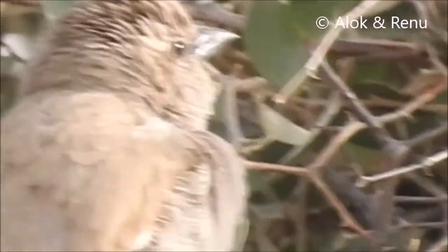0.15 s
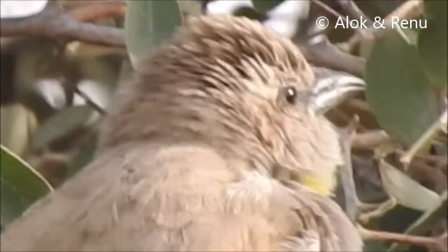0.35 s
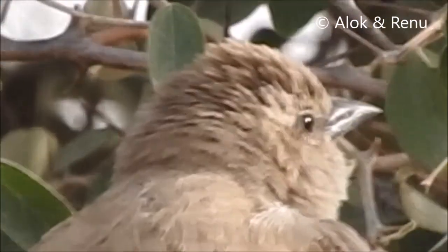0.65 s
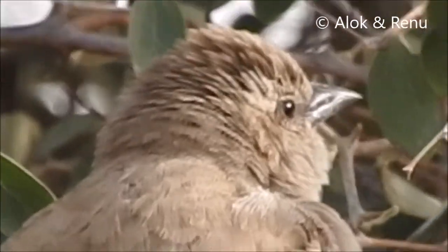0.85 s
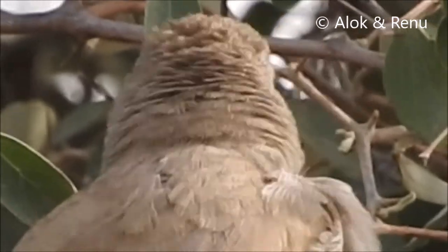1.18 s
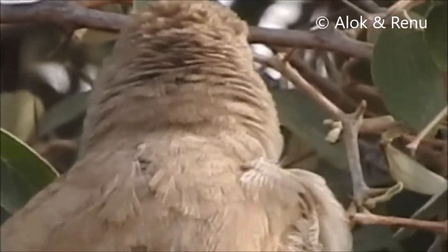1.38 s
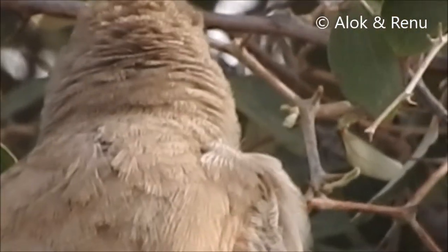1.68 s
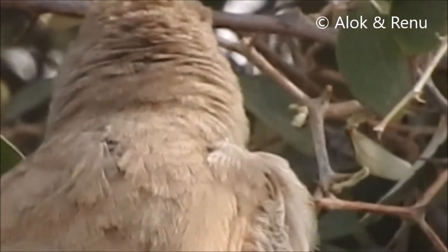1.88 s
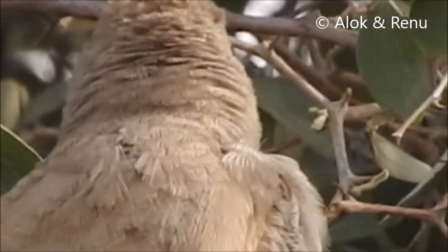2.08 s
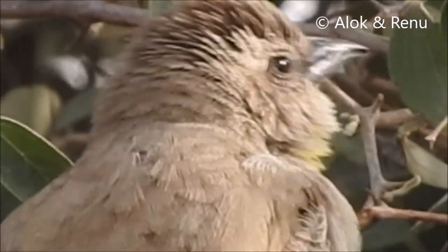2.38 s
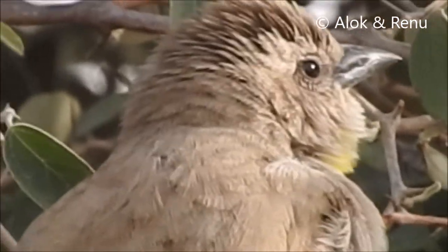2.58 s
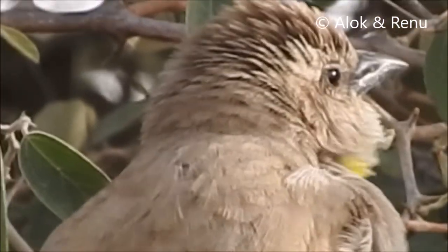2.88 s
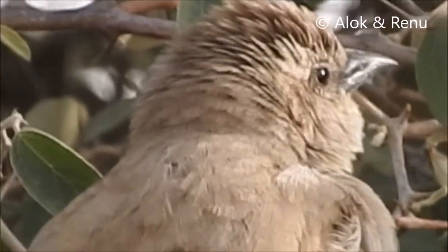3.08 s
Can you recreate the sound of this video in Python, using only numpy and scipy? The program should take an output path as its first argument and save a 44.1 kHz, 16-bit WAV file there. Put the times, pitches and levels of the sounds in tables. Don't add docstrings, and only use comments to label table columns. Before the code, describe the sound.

A sparrow chirps close to a stereo microphone in a leafy bush, four brief sharp chirps spaced apart; fainter neighbours answer between them, twigs tick, and dull traffic, low hum and wind lie quietly behind.

```python
import sys
import numpy as np
from scipy import signal
from scipy.fft import rfft, irfft
from scipy.io import wavfile
from scipy.ndimage import uniform_filter1d

SR = 44100
rng = np.random.default_rng(int(sys.argv[2]) if len(sys.argv) > 2 else 0)


def store_pcm(level_fs):
    pcm = np.round(np.clip(level_fs, -1, 1) * 32767).astype(np.int16)
    wavfile.write(sys.argv[1], SR, np.atleast_2d(pcm).T)


def convert_level_to_amplitude(level_db):
    exponent = np.asarray(level_db, float) / 20
    return 10 ** exponent


N = 143325

STRONG_WAVER_HZ, SLIGHT_WAVER_HZ = 60.4, 39.4


def rms_one(x):
    return x / np.sqrt(np.mean(x ** 2) + 1e-20)


def at_hz(points, hz):
    table_hz, value = np.transpose(points)
    return np.interp(np.log(hz), np.log(table_hz), value)


def drift(rate_hz):
    r = np.exp(-2 * np.pi * rate_hz / SR)
    noise = rng.standard_normal(N + SR)
    settled = signal.lfilter([1], [1, -2 * r, r * r], noise)[SR:]
    return rms_one(settled)


def resonance(x, hz, width_hz):
    r = np.exp(-np.pi * width_hz / SR)
    zeros = np.array([1, 0, -1]) * (1 - r * r) / 2
    poles = [1, -2 * r * np.cos(2 * np.pi * hz / SR), r * r]
    return signal.lfilter(zeros, poles, x)


def stereo_noise(colour, patchy_db=0.):
    # f/Hz, likeness [-1..1]
    likeness = [(40, 0.2), (200, 0.86), (1500, 0.74), (5000, 0.3), (9000, 0.12)]
    hz = np.maximum(np.fft.rfftfreq(N, 1 / SR), 1)
    alike = np.clip(at_hz(likeness, hz), -1, 1)
    mid, side = rfft(rng.standard_normal((2, N))) * colour(hz)
    both = irfft(np.sqrt(1 + alike) * mid + np.sqrt(1 - alike) * side * [[1], [-1]], N)
    return rms_one(both * convert_level_to_amplitude(patchy_db * drift(11.8)))


def murmur(x):
    out = 0
    for k, hz in enumerate(np.geomspace(220, 2600, 22)):
        swell = convert_level_to_amplitude(3.26 * drift(4.73))
        out = out + (-1) ** k * swell * resonance(x, hz, hz / 7.4)
    return rms_one(out)


def traffic():
    # f/Hz, level per Hz/dB
    wash_colour = [(250, -1), (470, -9.5), (900, -8), (1500, -16.5), (3000, -23.5)]
    wash = stereo_noise(lambda hz: convert_level_to_amplitude(at_hz(wash_colour, hz)) / (1 + (70 / hz) ** 4), patchy_db=-0.8)
    return murmur(wash)


def wind():
    wind_hz = 66.1

    def colour(hz):
        above = 1 + (hz / wind_hz / 2.42) ** 4
        below = 1 + (wind_hz * 0.66 / hz) ** 11.0
        return 1 / above / below
    return stereo_noise(colour, patchy_db=2.5)


def machine_hum():
    # f/Hz, width/Hz, level/dB
    hum_bands = [
        (120.3, 2.9, -59),
        (188.3, 23, -50.5),
        (216.5, 29.6, -51),
        (145, 70, -57),
    ]
    out = 0
    for hz, width_hz, db in hum_bands:
        band = stereo_noise(lambda f: 1 / (1 + (2 * (f - hz) / width_hz) ** 2))
        out = out + convert_level_to_amplitude(db) * band
    return out


def hiss():
    # f/Hz, level per Hz/dB
    hiss_colour = [(2000, -4), (4500, 3.5), (6600, -1), (9000, -5), (15500, -15)]
    return convert_level_to_amplitude(-58) * stereo_noise(lambda hz: convert_level_to_amplitude(at_hz(hiss_colour, hz)) / (1 + (1000 / hz) ** 2))


def street():
    # t/s, traffic level/dB, wind level/dB
    street_swell = [
        (.2, -48.5, -57.5),
        (.7, -51.5, -52.5),
        (1.45, -53.5, -55.5),
        (1.64, -53.5, -55),
        (1.82, -49, -61),
        (1.95, -54, -53),
        (2.4, -57.5, -48.5),
        (3.25, -57.5, -50.5),
    ]
    s, traffic_db, wind_db = np.transpose(street_swell)
    t = np.arange(N) / SR
    moving_traffic = convert_level_to_amplitude(np.interp(t, s, traffic_db)) * traffic()
    gusts = convert_level_to_amplitude(np.interp(t, s, wind_db) + 5.0) * wind()
    return moving_traffic + gusts + machine_hum() + hiss()


def distant_sounds():
    # t/s, length/s, f/Hz, width/Hz, level/dB
    far_events = [
        (.01, 1.7, 6300, 1400, -64),
        (.112, .056, 4000, 2500, -56),
        (1.062, .016, 4400, 2400, -47),
        (1.077, .019, 5000, 2400, -43),
        (1.1, .23, 3150, 100, -66),
        (1.6, .65, 340, 220, -55),
        (1.632, .016, 830, 150, -49),
        (1.85, .07, 3000, 700, -60),
        (2.03, .06, 5800, 900, -60),
        (2.172, .02, 4500, 1500, -52),
    ]
    t, out = np.arange(N) / SR, 0
    for s, length, hz, width_hz, db in far_events:
        noise = rng.standard_normal((2, N))
        band = resonance(resonance(noise, hz, width_hz), hz, width_hz)
        band = rms_one(band[0] + 0.28 * band[1] * [[1], [-1]])
        envelope = np.sin(np.pi * np.clip((t - s) / length, 0, 1)) ** 0.18
        out = out + convert_level_to_amplitude(db + 1.9 * drift(220)) * envelope * band
    return out


def bush(x, scatter_db):
    fall_60db_s, alike = .05, .3
    t = np.arange(SR // 8) / SR
    spray = rng.standard_normal((3, len(t))) * (rng.random((3, len(t))) < .04)
    spray = spray * convert_level_to_amplitude(-60 * t / fall_60db_s) * (t > .001)
    ears = np.sqrt(alike) * spray[0] + np.sqrt(1 - alike) * spray[1:]
    ears = convert_level_to_amplitude(scatter_db) * ears / np.sqrt(np.sum(ears ** 2, axis=1, keepdims=True))
    return x + signal.fftconvolve(ears, x[None])[:, :N]


def twigs():
    # t/s, rms level/dB, length/s, thud share/dB
    ticks = [
        (0.612, -50, 0.025, -14),
        (0.7005, -41, 0.004, -22),
        (0.706, -40, 0.005, -22),
        (2.253, -49, 0.007, -30),
        (3.112, -45, 0.002, -25),
        (3.1215, -31.5, 0.007, -22),
        (3.217, -51, .006, -20),
        (3.2275, -33, 0.009, -22),
    ]
    # f/Hz, width/Hz, level/dB
    twig_modes = [(3330, 860, -9.5), (4750, 1150, -0.5), (6280, 1000, -0.5), (9800, 5400, -27)]
    t = np.arange(N) / SR
    crackle = rms_one(rng.standard_normal(N) * convert_level_to_amplitude(2.6 * drift(690)))
    bright, dull = np.full(N, 1e-18), np.full(N, 1e-18)
    for s, db, length, dull_db in ticks:
        u = np.maximum(t - s, 0) / length * 2.03
        bright += convert_level_to_amplitude(db) * (u * np.exp(1 - u)) ** 1.8
        dull += convert_level_to_amplitude(db + dull_db) * u * np.exp(1 - u / 1.81)
    ring = 0
    for k, (hz, width_hz, db) in enumerate(twig_modes):
        ring = ring + convert_level_to_amplitude(db + 9.5) * (-1) ** k * resonance(bright * crackle, hz, width_hz)
    thud = convert_level_to_amplitude(16.0) * resonance(dull * crackle, hz=1400, width_hz=550)
    return bush(ring + thud, scatter_db=-8)


def whistles(notes, partials, waver_hz, warble=0):
    edge_s, fade_db, glide = .002, 25, int(.002 * SR)
    warble_rate_hz, warble_depth_hz, warble_below_hz = 140, 170, 4200
    out, t = np.zeros(N), np.arange(N) / SR
    waver = waver_hz * drift(186)
    for note in notes:
        s, hz, db = np.transpose(note)
        span = slice(int((s[0] - edge_s) * SR), int((s[-1] + edge_s) * SR))
        pitch = uniform_filter1d(np.interp(t[span], s, hz), glide)
        low_fall = 1. * (pitch < warble_below_hz) * (np.gradient(pitch) < 0)
        low_fall = uniform_filter1d(low_fall, glide)
        beat = 2 * np.pi * warble_rate_hz * (t[span] - s[0])
        bent = warble * low_fall * warble_depth_hz * np.cos(beat)
        turns = np.cumsum(pitch + waver[span] + bent) / SR
        edge_times = [s[0] - edge_s, *s, s[-1] + edge_s]
        height_db = np.interp(t[span], edge_times, [db[0] - fade_db, *db, db[-1] - fade_db])
        height = convert_level_to_amplitude(height_db) * (1 - warble * low_fall * np.sin(beat) / 2)
        for k, level_db in partials:
            out[span] += height * convert_level_to_amplitude(level_db) * np.sin(2 * np.pi * k * turns)
    return out * convert_level_to_amplitude(1.2 * drift(260))


def short_notes():
    # t/s, length/s, first f/Hz, last f/Hz, level/dB
    slide_table = [(.614, .012, 4600, 4400, -52), (.7015, .003, 5000, 4300, -35),
                   (.7075, .003, 4800, 4200, -35), (1.045, 0.009, 6960, 3640, -36),
                   (1.061, .007, 4900, 3400, -40), (1.063, .006, 6200, 5000, -42),
                   (1.068, .02, 2450, 2750, -46), (1.078, 0.006, 4600, 3900, -35),
                   (1.084, .006, 4400, 3500, -35), (1.092, .005, 4000, 3300, -43),
                   (1.427, 0.009, 3000, 4350, -36), (2.195, .01, 2600, 3700, -43),
                   (2.259, 0.011, 3650, 3100, -33), (2.507, .01, 3250, 3650, -51),
                   (2.56, 0.016, 2610, 3950, -42), (2.582, 0.015, 2640, 2577, -35.5),
                   (2.624, .008, 3300, 4200, -51), (2.627, 0.013, 2400, 4410, -42),
                   (2.698, .008, 2500, 3400, -50)]
    # t/s, length/s, edge f/Hz, middle f/Hz, level/dB
    arch_table = [
        (1.077, 0.017, 4930, 6760, -50),
        (2.644, 0.027, 2350, 3504, -36),
        (2.714, 0.026, 2630, 3340, -44),
    ]
    u = np.arange(9) / 8
    bend = 4 * u * (1 - u)
    swell_db = -11 * (1 - bend) ** 0.66
    slides = [np.c_[s + length * u, a + (b - a) * u, db + swell_db] for s, length, a, b, db in slide_table]
    arches = [np.c_[s + length * u, a + (b - a) * bend, db + swell_db] for s, length, a, b, db in arch_table]
    return slides + arches


def neighbours():
    # t/s, f/Hz, level/dB
    far_first = [
        [(.113, 4750, -44), (.119, 4090, -41.5), (.126, 4500, -46)],
        [(.126, 3010, -47), (.13, 4060, -48), (.134, 5500, -45), (.14, 4260, -42)],
        [(.116, 2680, -50), (.121, 2720, -49), (.126, 2870, -50)],
        [(.131, 3520, -44), (.136, 2640, -46), (.142, 2690, -45), (.146, 3500, -38)],
        [(.157, 2600, -44), (.162, 2700, -51), (.166, 3480, -37.5)],
    ]
    far_middle = [
        [(1.436, 2570, -38), (1.444, 2817, -32.5), (1.452, 2786, -31.5), (1.464, 2808, -32), (1.469, 2880, -41),
         (1.473, 2950, -40), (1.49, 2920, -51)],
        [(1.374, 3890, -37), (1.38, 3750, -45), (1.386, 3430, -33), (1.394, 3400, -36)],
    ]
    far_late = [
        [(2.19, 4320, -41), (2.194, 3360, -39), (2.198, 2890, -46), (2.202, 3810, -40), (2.207, 4510, -43),
         (2.212, 4260, -50), (2.216, 3890, -39), (2.219, 3280, -32), (2.222, 3020, -42)],
        [(2.223, 2950, -46), (2.23, 2750, -35.5), (2.235, 2760, -41), (2.24, 2740, -37), (2.248, 3180, -40),
         (2.256, 2775, -37.5), (2.262, 2650, -41)],
    ]
    hidden, clear = [], []
    for note in far_first + far_middle + far_late + short_notes():
        deep = note[0][0] < 1.2 or note is far_late[0]
        (hidden if deep else clear).append(note)
    partials = [(1, 0.014), (2, -20)]
    clear_birds = bush(whistles(clear, partials, SLIGHT_WAVER_HZ), scatter_db=-12)
    hidden_birds = bush(whistles(hidden, partials, STRONG_WAVER_HZ), scatter_db=-5)
    return clear_birds + hidden_birds


def near_sparrow():
    # t/s, f/Hz, level/dB
    chirp_1 = [
        [(.175, 6100, -34), (.179, 5400, -40), (.181, 6300, -34), (.184, 5550, -21), (.187, 5470, -42),
         (.192, 6220, -17), (.195, 6600, -31)],
        [(.197, 7120, -38), (.2, 7500, -38), (.203, 7240, -28), (.206, 6330, -23), (.2085, 6070, -18.5),
         (.212, 5410, -27.5), (.219, 5350, -31.5)],
    ]
    chirp_2 = [
        [(0.426, 3810, -40), (.432, 4710, -34.5), (0.437, 5590, -23.5), (0.44, 6050, -24), (0.443, 4870, -34),
         (0.452, 4390, -36), (.462, 3990, -32), (0.468, 3940, -30.5), (0.479, 3370, -38)],
        [(0.483, 3260, -31.5), (0.487, 4150, -28), (.493, 4750, -33), (0.5, 5000, -38), (0.504, 4100, -26),
         (0.513, 3594, -29.5), (0.527, 3433, -26), (.535, 3540, -37), (0.543, 2820, -40.5)],
    ]
    chirp_3 = [
        [(1.704, 5210, -43), (1.706, 6040, -27), (1.708, 6960, -37), (1.711, 7470, -37), (1.714, 7020, -37),
         (1.7175, 5930, -15.5), (1.72, 4920, -31.5), (1.724, 2970, -41.5), (1.726, 3920, -40)],
        [(1.729, 6000, -26), (1.734, 5910, -18), (1.737, 5700, -31), (1.739, 4680, -36), (1.742, 3560, -42)],
        [(1.7385, 5650, -12), (1.741, 6330, -38), (1.743, 7200, -34), (1.746, 7620, -35), (1.749, 6710, -26),
         (1.7515, 5920, -20), (1.754, 5440, -19), (1.757, 4700, -51), (1.762, 3680, -35)],
    ]
    chirp_4 = [
        [(2.968, 3160, -35), (2.973, 4680, -26.5), (2.9765, 5680, -16.5), (2.981, 6410, -25),
         (2.985, 5810, -25.5), (2.99, 5410, -18.5), (2.996, 5200, -21.5), (3.002, 5430, -34),
         (3.009, 3260, -28.5)],
        [(3.012, 3330, -31), (3.016, 4130, -23.5), (3.022, 4820, -32), (3.03, 5420, -28), (3.034, 5200, -30),
         (3.037, 4000, -24), (3.042, 4130, -26)],
        [(3.044, 3800, -32), (3.0475, 3415, -22), (3.051, 3450, -25.5), (3.055, 3300, -50), (3.06, 2580, -31.5)],
    ]
    nasal_notes = [
        [(2.949, 5990, -43), (2.957, 5510, -31.5), (2.962, 5500, -33), (2.966, 5800, -40), (2.97, 6700, -40)],
        [(1.053, 4860, -37.5), (1.057, 5020, -42), (1.061, 5060, -36)],
    ]
    nasal_low_db = (-15, -5)
    song = whistles(chirp_1 + chirp_2 + chirp_3 + chirp_4, [(1, 0), (2, -42)], STRONG_WAVER_HZ, warble=0.9)
    for note, low_db in zip(nasal_notes, nasal_low_db):
        song += whistles([note], [(1, 0), (1 / 2, low_db), (3 / 2, -27)], SLIGHT_WAVER_HZ)
    return bush(song, scatter_db=-6.5)


def scene():
    return street() + distant_sounds() + twigs() + neighbours() + near_sparrow()


def roll_off(x):
    return signal.sosfilt(signal.butter(12, 16070, fs=SR, output="sos"), x)


def record(dry):
    low_pass = signal.cheby2(12, 60, 16800, fs=SR, output="sos")
    mix = signal.sosfilt(low_pass, dry)
    return roll_off(mix)


dry = scene()
out = record(dry)
store_pcm(out)
```